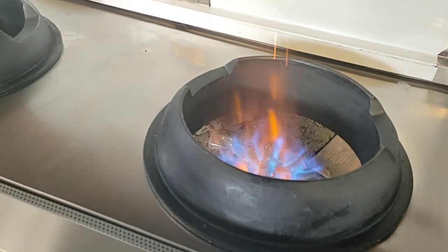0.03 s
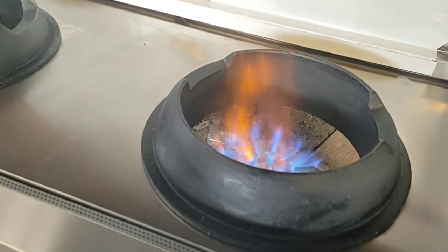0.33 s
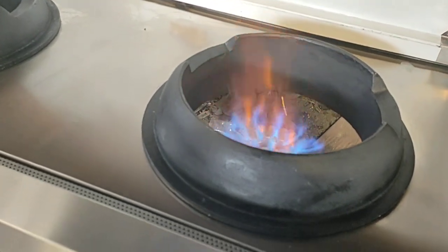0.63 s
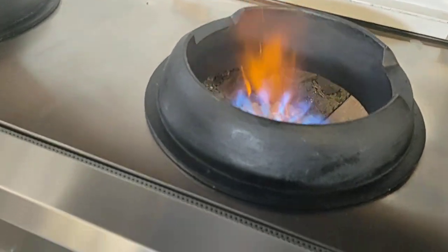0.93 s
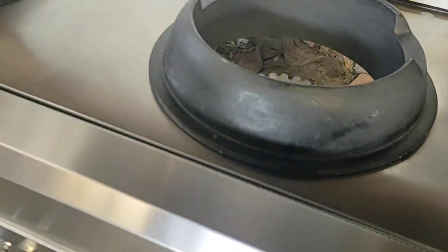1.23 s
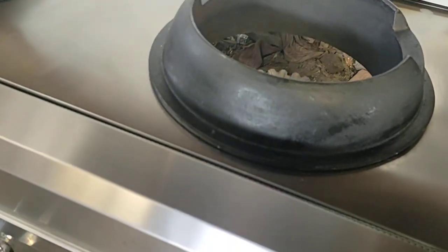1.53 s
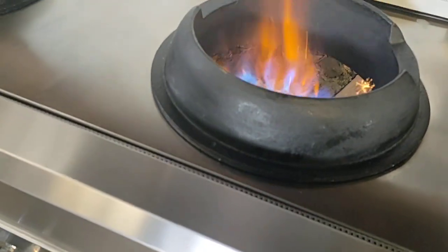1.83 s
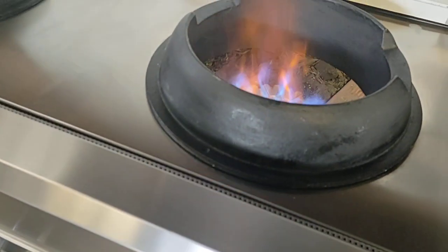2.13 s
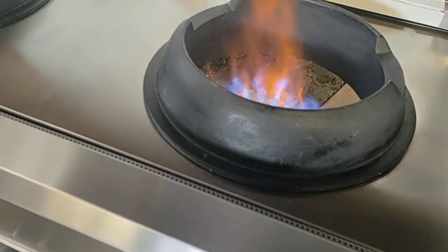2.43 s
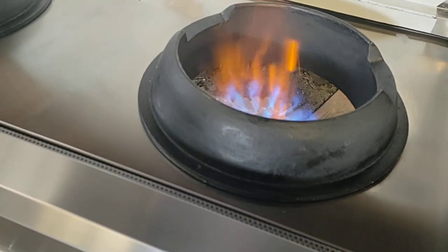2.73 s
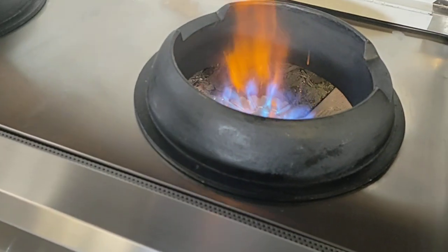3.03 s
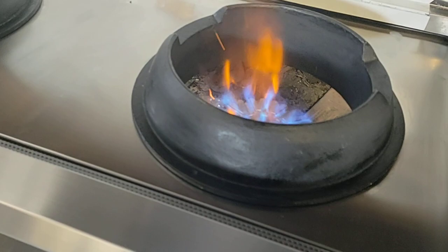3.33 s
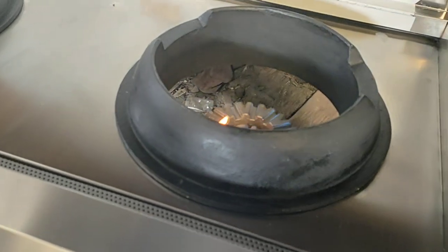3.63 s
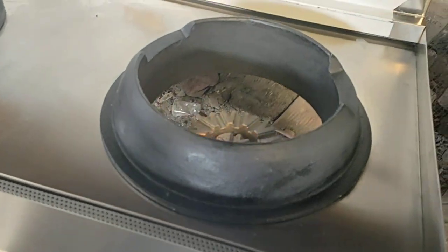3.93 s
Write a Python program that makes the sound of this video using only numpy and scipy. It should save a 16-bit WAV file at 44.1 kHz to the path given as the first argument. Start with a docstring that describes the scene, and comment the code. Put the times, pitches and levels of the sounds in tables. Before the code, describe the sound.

Close up in a commercial kitchen, a gas burner's flame roars over a hissing blower and a thin climbing whine. The flame drops out, catches again with a soft thump, roars on and fades, leaving the blower running.

```python
"""A forced-air wok burner, close by in a steel kitchen. From the start a turbulent flame roars in its
iron well, while the blower hisses through the burner head and a thin whine climbs over a low hum.
At 1.2 s the flame dies away. At 1.7 s gas spurts in and lights with a whoomp and a soft thump;
near 2 s the jet sizzles and whistles as it settles. At 3.5 s the flame dies again; the blower runs on."""
import sys
import numpy as np
from scipy import signal
from scipy.fft import rfft, irfft
from scipy.io import wavfile

SR = 44100
rng = np.random.default_rng(int(sys.argv[2]) if len(sys.argv) > 2 else 0)


def generate_wav(sig):
    """Save sig (samples, or channels by samples) to the path in sys.argv[1] as 16-bit PCM at SR."""
    pcm = np.round(np.clip(np.atleast_2d(sig).T, -1, 1) * 32767).astype(np.int16)
    wavfile.write(sys.argv[1], SR, pcm)


N = 176400
T = np.arange(N) / SR


def amp(db):
    """Amplitude ratio of a level: tenfold per 20 dB."""
    return 10 ** (np.asarray(db) / 20)

def unit(x):
    """Normalisation to rms 1."""
    return x / np.sqrt(np.mean(abs(x) ** 2) + 1e-20)

def curve(rows, column=1):
    """Linear interpolation of a table in time."""
    rows = np.array(rows)
    return np.interp(T, rows[:, 0], rows[:, column])

def over_hz(rows, hz, column=1):
    """Interpolation of a table in log frequency."""
    rows = np.array(rows)
    return np.interp(np.log(hz + 1), np.log(rows[:, 0]), rows[:, column])

def swell(centre_s, width_s, peak_db):
    """Gaussian envelope, down to 1/e at width_s from its centre."""
    return amp(peak_db) * np.exp(-((T - centre_s) / width_s) ** 2)

def drift(rate_hz):
    """Random fluctuation of rms 1: noise low-passed at about rate_hz."""
    hz = np.fft.rfftfreq(N, 1 / SR)
    white = rfft(rng.standard_normal(N))
    return unit(irfft(white * hz / (hz + 2) / (1 + (hz / rate_hz) ** 2), N))

def scatter(rate_hz):
    """Rayleigh fading: a random amplitude and phase in each channel."""
    return np.array([drift(rate_hz) + 1j * drift(rate_hz) for _ in range(2)])

def resonance(hz, width_hz):
    """A noise-driven resonance gives a tone of wandering amplitude and phase."""
    return unit((scatter(width_hz) * np.exp(2j * np.pi * hz * T)).real)

def steel_reflections(hz, echo, decay_s=0.017):
    """Interference of early reflections from the steel range ripples the treble response."""
    taps = rng.standard_normal((2, N)) * np.exp(-T / decay_s) * (T > .001)
    treble = (hz ** 2 / (hz ** 2 + 1800 ** 2)) ** 2
    return unit(1 + echo * unit(rfft(taps)) * treble)

def turbulence(spectrum, field, echo, mono_below_hz=645):
    """Turbulent noise of rms 1 in two channels: below about 645 Hz both channels carry the same sound, while
    the treble spreads wide."""
    hz = np.fft.rfftfreq(N, 1 / SR)
    common, independent = rfft(rng.standard_normal((2, N)))
    apart = hz ** 20 / (hz ** 20 + mono_below_hz ** 20)
    coherence = 1 - apart * (1 - np.clip(over_hz(field, hz), 0, 1))
    coherence = np.minimum(coherence, .999)
    left_lead = apart * over_hz(field, hz, column=2)
    balance = amp(apart * over_hz(field, hz, column=3))
    right = (coherence * common + np.sqrt(1 - coherence ** 2) * independent) * np.exp(-1j * left_lead)
    pair = np.array([common * balance, right]) / np.sqrt(1 + balance ** 2)
    return unit(irfft(pair * amp(over_hz(spectrum, hz)) * steel_reflections(hz, echo), N))


# Envelopes of the roar and of the jets' rush: t/s, level/dB
ROAR_LEVEL = [(0, -25), (.6, -25), (1.1, -23), (1.17, -29.5), (1.25, -46.5), (1.67, -62), (1.72, -27.5),
              (1.76, -26.5), (1.815, -19.5), (1.87, -20.5), (1.95, -23.3), (2.6, -23.5), (3.42, -23),
              (3.54, -26.5), (3.585, -38.5), (3.73, -50), (4, -64)]
RUSH_LEVEL = [(0, -23), (.7, -22.5), (1.07, -23.5), (1.16, -32), (1.23, -45), (1.67, -41), (1.73, -19),
              (1.765, -24), (1.795, -21.5), (1.82, -18), (1.9, -22), (2.4, -23), (3.42, -23.5), (3.52, -28),
              (3.6, -40), (4, -57)]
# Spectra of the flame in its well and of the jets: f/Hz, relative density/dB
ROAR_SPECTRUM = [(20, -19), (45, -15), (85, -3), (120, -11), (165, 1.9), (190, -2), (215, -0.5),
                 (285, -4.5), (322, 1), (350, -8), (415, -9.5), (475, 5), (515, 0), (570, 3), (602, -8.5),
                 (628, 0), (680, -7.5), (765, -3), (855, -18), (915, -8.5), (1040, -13), (1125, -2),
                 (1300, -18), (1800, -13), (4000, -58)]
RUSH_SPECTRUM = [(300, -36), (1000, -9.5), (1340, -8), (1500, -6), (1800, -4), (2060, -6), (2200, -2),
                 (2480, 1), (2750, 0), (2930, 1), (3130, -1.5), (3330, -3.5), (3600, -6.5), (4100, -5),
                 (4700, -8), (5400, -18.5), (6800, -22.5), (7400, -23.5), (8300, -34), (9500, -36.5),
                 (10100, -30), (11000, -34.5), (12200, -33), (13300, -36), (14650, -39), (15000, -29.5),
                 (15300, -44)]
# Stereo field of the flame: f/Hz, coherence, left lead/rad, left minus right/dB
FLAME_FIELD = [(450, 1, 3.5, 6), (710, 0.71, -0.5, -1.5), (1370, 1, 0.96, -.5), (2050, 0.39, -1.1, -5),
               (2760, 0.46, 1.0, -11.5), (3310, 0.96, 1.32, -6), (4680, 1, 2, -2), (6500, .25, 2.5, -2),
               (10000, .2, 1.5, -5.5), (15000, .2, 1.5, -5.5)]
def flame():
    """Combustion noise: the roar, coloured by the well's resonances, flickers with the jets' rush."""
    lick, flutter = drift(rate_hz=12), drift(rate_hz=90)
    roar_db = curve(ROAR_LEVEL) + 0.58 * lick + 0.58 * flutter
    rush_db = curve(RUSH_LEVEL) + 0.35 * lick + 0.76 * flutter
    roar = amp(roar_db) * turbulence(ROAR_SPECTRUM, FLAME_FIELD, echo=.4)
    rush = amp(rush_db) * turbulence(RUSH_SPECTRUM, FLAME_FIELD, echo=.67)
    return roar + rush


# Envelope of the air hiss: t/s, level/dB
AIR_LEVEL = [(0, -35.5), (1.25, -33.5), (1.65, -30.5), (2.5, -34), (3.7, -32.5), (3.87, -29), (4, -29)]
# Spectrum of the air in the burner head: f/Hz, relative density/dB
AIR_SPECTRUM = [(25, -11), (60, -20), (118, -21), (160, 1), (190, -6), (222, 1), (270, -8.5), (330, -0.5),
                (415, -7), (570, -9), (612, -2), (720, -6.5), (1100, -7), (1450, -4.5), (1810, 4),
                (2150, 6), (2600, 7), (3350, 3.5), (4150, 9.5), (4700, -2), (5300, -3), (5900, 0),
                (6400, -10), (7300, -8.5), (8300, -24), (11000, -23.5), (14000, -33), (15000, -34),
                (15600, -55)]
# Stereo field of the air: f/Hz, coherence, left lead/rad, left minus right/dB
AIR_FIELD = [(500, 0.14, 3.4, -1), (900, 0.68, 1.8, -2.5), (1600, 0.17, 2.5, -3.5),
             (2550, 0.99, 1.57, -9.5), (4420, 0.34, 2.05, -5.5), (6760, 0.24, 0.51, -1.5),
             (15000, .2, 2.3, 2)]
# Modes of the blower housing: f/Hz, width/Hz, level/dB
HOUSING_MODES = [(4180, 40, -48.5), (4640, 55, -50), (4810, 80, -50)]
def blower():
    """Flow noise: air forced through the burner head hisses, and the housing's modes ring faintly."""
    air = turbulence(AIR_SPECTRUM, AIR_FIELD, echo=1.0) * amp(curve(AIR_LEVEL) + .25 * drift(8))
    rings = sum(amp(db) * resonance(hz, width_hz) for hz, width_hz, db in HOUSING_MODES)
    return air + rings


# Whine of the blower climbing to speed: t/s, f/Hz, level/dB
WHINE_GLIDE = [(0, 5000, -50), (.2, 5300, -40), (.55, 5590, -41), (.8, 5760, -34.5), (1.07, 5855, -42.5),
               (1.35, 5925, -42), (1.66, 5975, -36.5), (2.05, 5860, -41), (2.3, 5932, -41),
               (2.6, 5950, -38.5), (2.8, 5968, -43), (3.35, 5994, -39.5), (3.52, 5990, -33),
               (3.72, 5999, -38.5), (3.85, 6001, -35), (4, 6000, -39)]
def whine(waver_hz=2.5, octave_db=-25, left_lead_rad=.5, left_db=-2, echo=.32):
    """Multipath fading: the tone varies as the listener moves through its echoes; hot air scatters it."""
    phase = 2 * np.pi * np.cumsum(curve(WHINE_GLIDE) + waver_hz * drift(36)) / SR
    fundamental = np.exp(1j * np.array([phase + left_lead_rad, phase]))
    tone = fundamental + amp(octave_db) * np.exp(2j * phase)
    rush_db = curve(RUSH_LEVEL)
    heat = .75 * amp(rush_db - np.median(rush_db))  # the scattered share follows the flame
    paths = 1 + echo * scatter(rate_hz=4) + heat * scatter(rate_hz=8)
    paths /= np.sqrt(1 + 2 * echo ** 2 + 2 * heat ** 2)  # keeps the mean power
    level_db = curve(WHINE_GLIDE, column=2) + np.array([[left_db], [0]])
    return np.sqrt(2) * amp(level_db) * (tone * paths).real


# Envelope of the hum: t/s, level/dB
HUM_LEVEL = [(0, -43), (1.3, -48.5), (1.62, -46.5), (3.7, -66), (4, -60)]
# Spectrum of the drone above it: f/Hz, relative density/dB
DRONE_SPECTRUM = [(120, -45), (228, 0), (285, -9), (335, -3.5), (500, -41)]
def hum(hz=167.4, waver_hz=3.3, waver_db=1, drone_db=-3.5):
    """Random modulation makes the blower's low tone waver; a band of noise shares its envelope."""
    phase = 2 * np.pi * np.cumsum(hz + waver_hz * drift(4.9)) / SR
    tone = np.sqrt(2) * amp(waver_db * drift(9)) * np.sin(phase)
    drone = amp(drone_db) * turbulence(DRONE_SPECTRUM, AIR_FIELD, echo=0)
    return amp(curve(HUM_LEVEL)) * (tone + drone)


# Envelopes of the gas spurt and of the rumble that swells to a whoomp: t/s, level/dB
SPURT_LEVEL = [(1.665, -43), (1.72, -27.5), (1.815, -24.5), (1.86, -39), (1.95, -56), (2.4, -70)]
WHOOMP_LEVEL = [(1.25, -66), (1.66, -58), (1.72, -41), (1.77, -44), (1.815, -33), (1.87, -31.5), (2.0, -39),
                (3.4, -52), (3.7, -57)]
# Spectra of the spurt and of the whoomp: f/Hz, relative density/dB
SPURT_SPECTRUM = [(1500, -50), (4000, 8.5), (5800, 2), (8500, -17), (15000, -22)]
WHOOMP_SPECTRUM = [(20, 0), (55, 5), (100, 4), (200, 6), (400, -22), (2000, -70)]
def ignition(thump_s=1.815, thump_hz=58.4):
    """A combustion transient: gas spurts in and the cloud catches with a whoomp and a pressure pulse."""
    spurt = turbulence(SPURT_SPECTRUM, FLAME_FIELD, echo=1.0) * amp(curve(SPURT_LEVEL))
    whoomp = turbulence(WHOOMP_SPECTRUM, FLAME_FIELD, echo=0) * amp(curve(WHOOMP_LEVEL))
    thump = swell(thump_s, width_s=.013, peak_db=-20) * np.sin(2 * np.pi * thump_hz * (T - thump_s))
    return spurt + whoomp + thump


# Spectrum of the sizzle: f/Hz, relative density/dB
SIZZLE_SPECTRUM = [(3000, -28), (6600, 11), (8500, -9), (11000, -6), (15000, -13)]
def settling_jet():
    """Jet noise: a broadband sizzle and a narrowband whistle swell briefly as the flame settles."""
    sizzle = swell(2.04, width_s=.09, peak_db=-36.5) * turbulence(SIZZLE_SPECTRUM, FLAME_FIELD, echo=.7)
    whistle = swell(2.02, width_s=.06, peak_db=-44) * resonance(hz=6620, width_hz=60)
    return sizzle + whistle


def scene():
    """Superposition: the sound pressures of all sources add."""
    return flame() + blower() + whine() + hum() + ignition() + settling_jet()

def record(dry, cutoff_hz=15600):
    """Band limiting by a linear-phase low-pass filter."""
    lowpass = signal.firwin(511, cutoff_hz, window=("kaiser", 9), fs=SR)
    return signal.oaconvolve(dry, lowpass[None], "same")


dry = scene()
out = record(dry)
generate_wav(out)
```